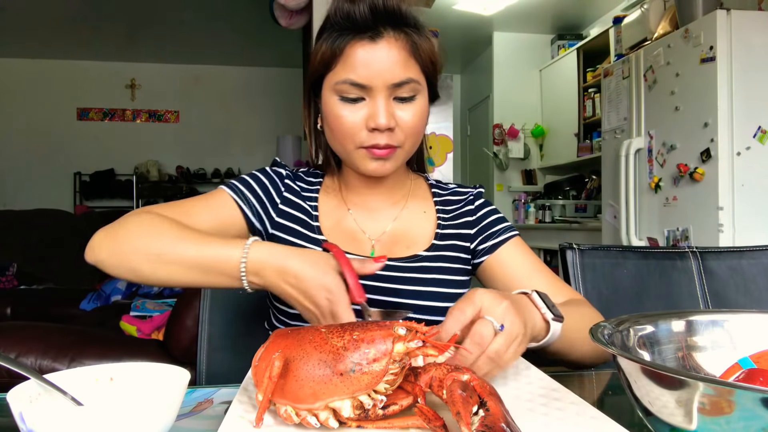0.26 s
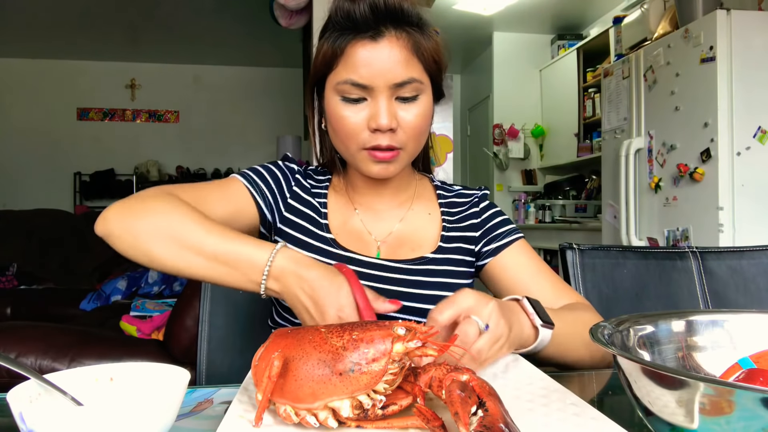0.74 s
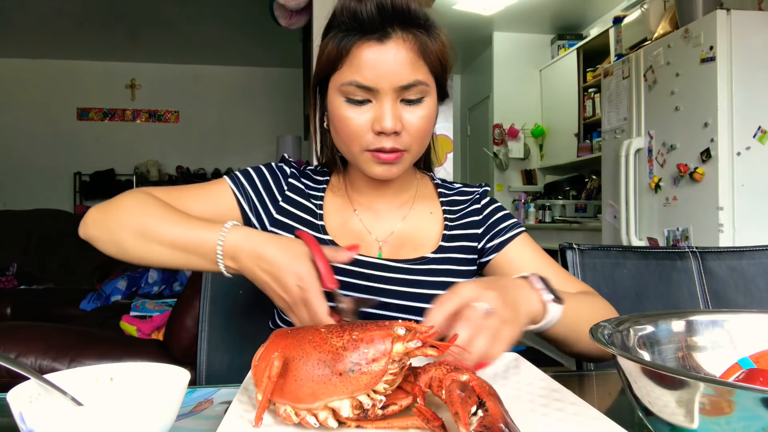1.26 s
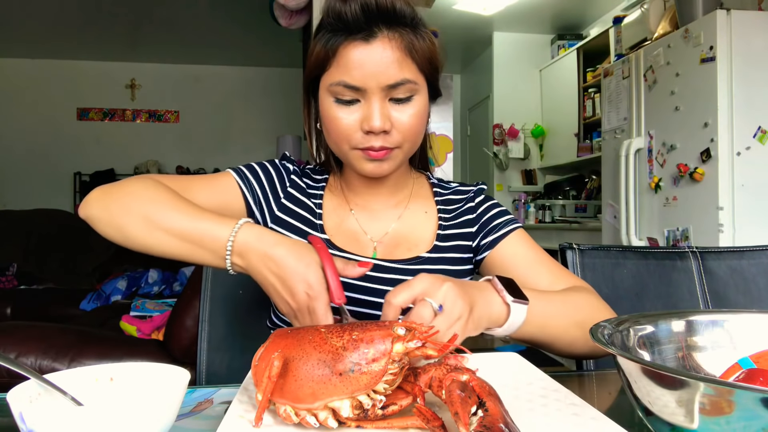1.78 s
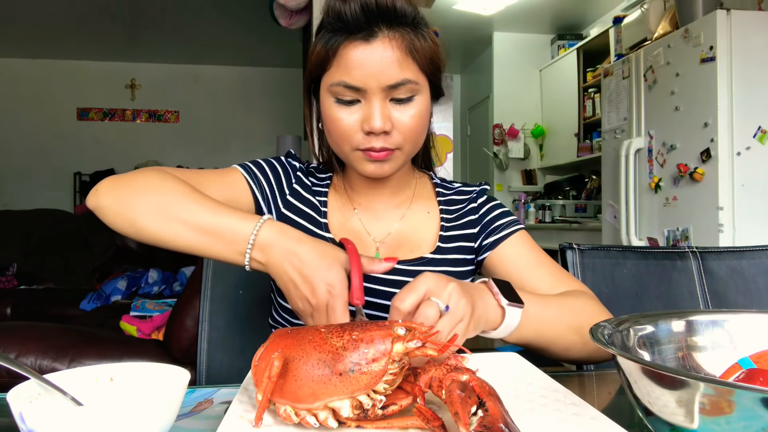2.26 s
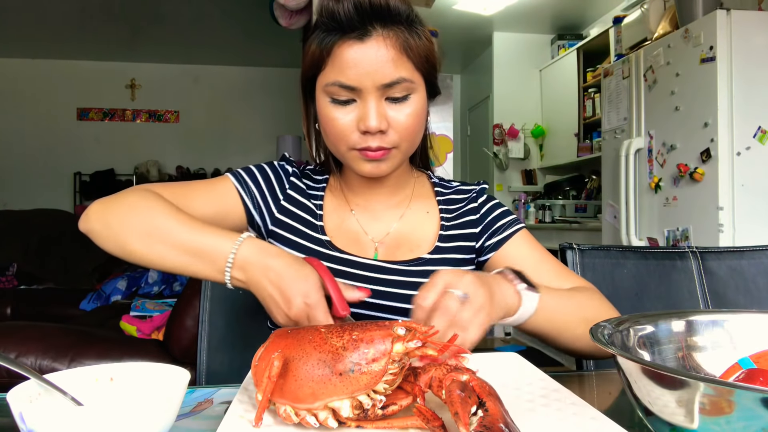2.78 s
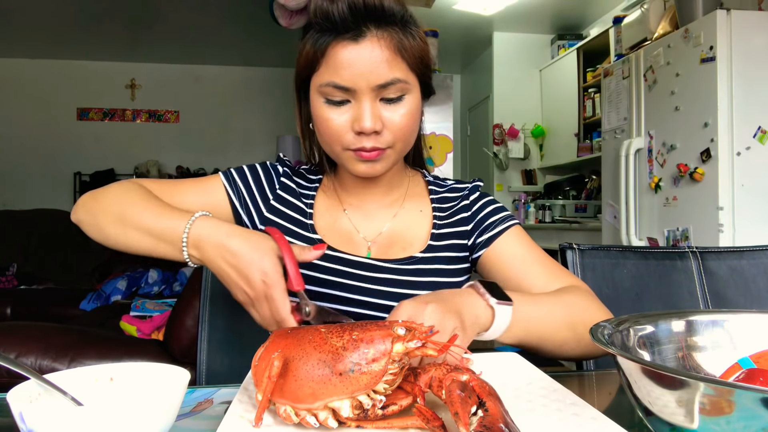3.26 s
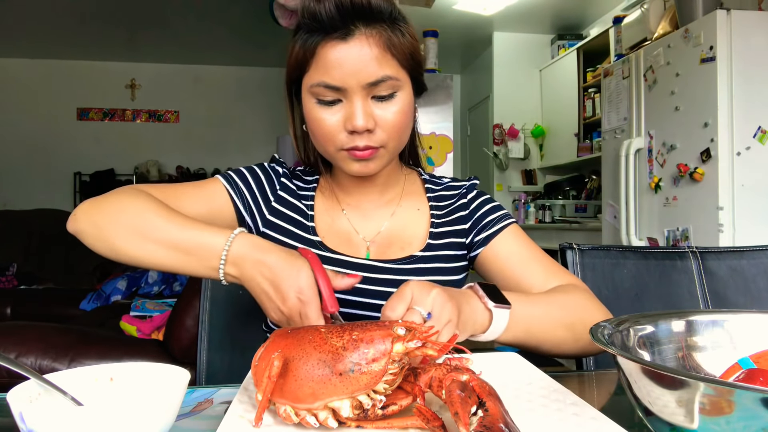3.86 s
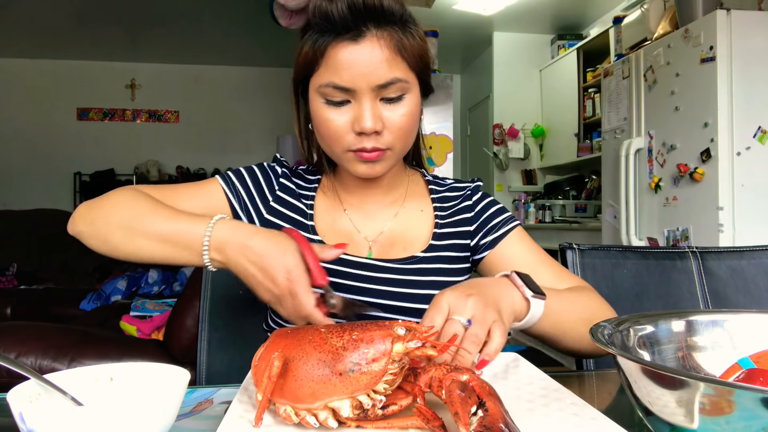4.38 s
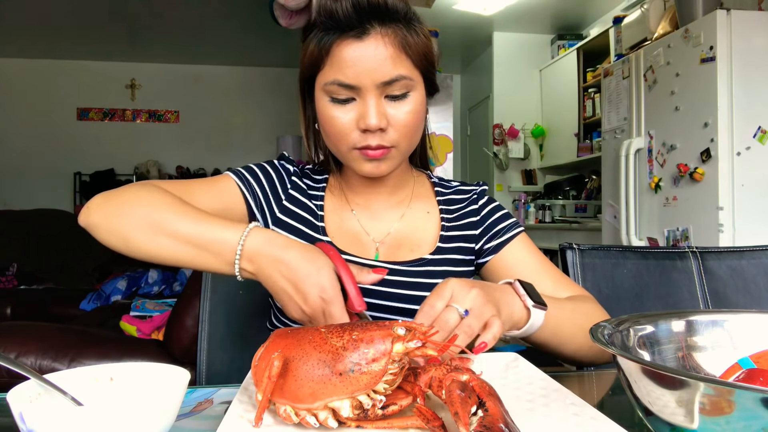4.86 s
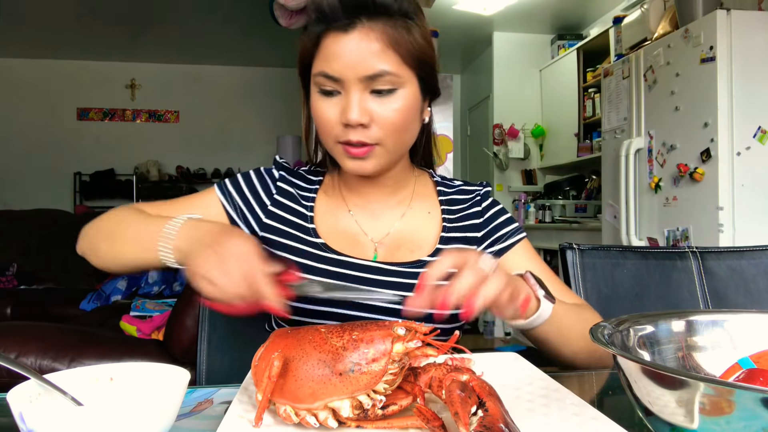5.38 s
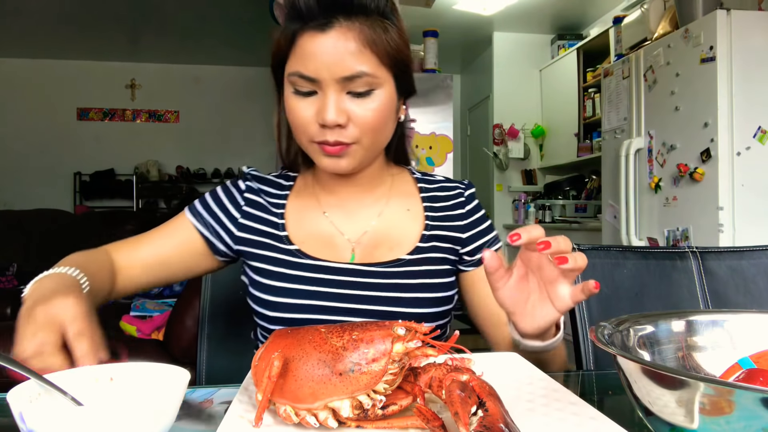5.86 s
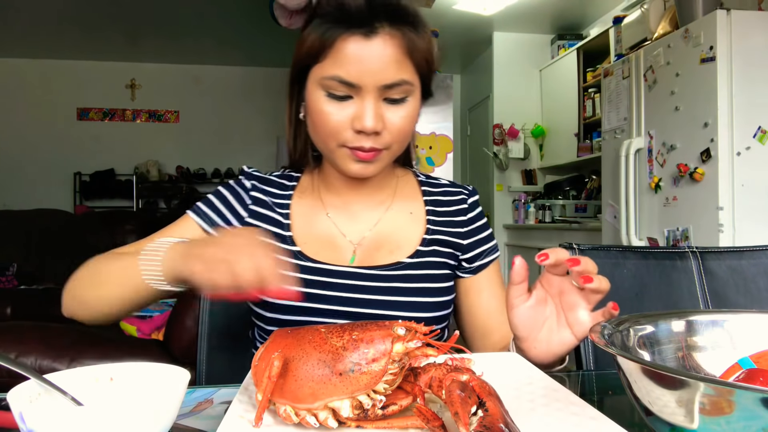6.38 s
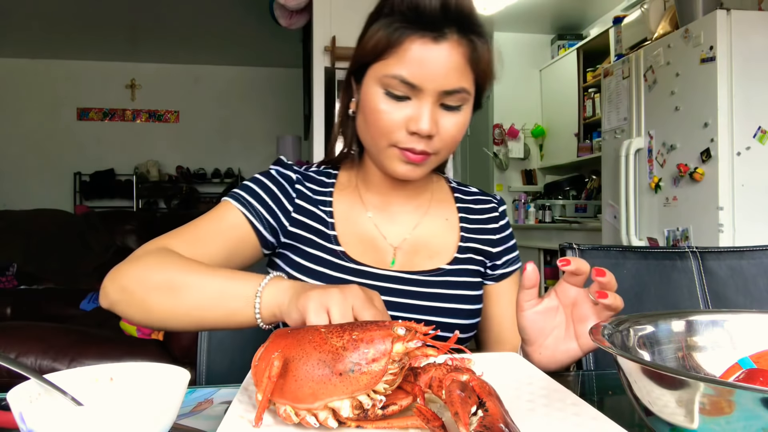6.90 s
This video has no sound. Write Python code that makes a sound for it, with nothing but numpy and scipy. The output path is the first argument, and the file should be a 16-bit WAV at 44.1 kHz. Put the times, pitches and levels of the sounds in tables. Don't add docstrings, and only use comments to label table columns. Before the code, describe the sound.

Sharp, cracking scissor cuts through cooked shell, faint steel scrapes and dull knocks, then scissors dropped on a tabletop over a low refrigerator drone.

```python
import sys
import numpy as np
from scipy import signal
from scipy.fft import rfft, irfft, next_fast_len
from scipy.io import wavfile

SR = 44100
rng = np.random.default_rng(int(sys.argv[2]) if len(sys.argv) > 2 else 0)


def transcribe(signal):
    frames = np.atleast_2d(signal).T
    limited = np.clip(frames, -1, 1)
    pcm = np.round(limited * 32767).astype(np.int16)
    wavfile.write(sys.argv[1], SR, pcm)


def level_to_linear(level):
    exponent = np.asarray(level, float) / 20
    return 10 ** exponent


N = 314433


def unit(x):
    return x / np.sqrt(np.mean(x ** 2) + 1e-20)


def along(points, hz):
    f, v = np.transpose(points)
    return np.interp(np.log(hz + 1), np.log(f + 1), v)


def filtered(x, response):
    m = next_fast_len(N + SR // 2)
    spectrum = rfft(x, m) * response(np.fft.rfftfreq(m, 1 / SR))
    return irfft(spectrum, m)[..., :N]


def resonances(peaks):
    def response(f):
        total = 0
        for k, (centre, width, db) in enumerate(peaks):
            damping = 1j * f * width
            total = total + (-1) ** k * level_to_linear(db) * damping / (centre * centre - f * f + damping)
        return total
    return response


def struck(events, modes, body, low_hz, high_hz, clatter_db, clatter_s, after_db, level_db, attack_s=0.00042):
    out, t = np.zeros((2, N + SR)), np.arange(SR // 3) / SR
    hz, mode_db, t60 = np.transpose(modes)[:, :, None]
    bins = np.fft.rfftfreq(len(t), 1 / SR)
    for s, db, low_db, high_db, ring_db, note_hz in events:
        def tilt_db(f):
            return low_db / (1 + (f / low_hz) ** 4) + high_db / (1 + (high_hz / (f + 1)) ** 4)

        favour_db = 8 * np.exp(-(np.log(hz / note_hz) / 0.091) ** 2)
        luck_db, detune = rng.standard_normal((2, len(modes), 1))
        pitch = hz * (1 + 0.003 * detune)
        knots = rng.standard_normal((len(modes), 40))
        waver = np.array([np.interp(t * 90, np.arange(40), row) for row in knots])
        flutter_db = 4.5 * np.minimum(t / 0.02, 1) * waver
        strength_db = mode_db + tilt_db(hz) + ring_db + favour_db + 1.03 * luck_db
        rings = level_to_linear(strength_db + flutter_db - 60 * t / t60) * np.sin(2 * np.pi * pitch * t)
        noise = unit(irfft(rfft(rng.standard_normal(len(t))) * level_to_linear(along(body, bins))))
        noise = irfft(rfft(noise) * level_to_linear(tilt_db(bins)))
        fall = level_to_linear(-60 * t / clatter_s) + level_to_linear(after_db - 12 * t / clatter_s)
        both = np.array([rings.sum(axis=0), level_to_linear(clatter_db) * fall * noise])
        out[:, round(s * SR):][:, :len(t)] += level_to_linear(db + level_db) * both * (1 - np.exp(-t / attack_s))
    return out[:, :N]


# start in seconds, peak in dB, hollow shell in dB,
# blade tips in dB, favoured note in Hz.
SNIPS = [
    (0.8908, -6.5, -10.5, -5, 6010),
    (2.676, -5, -4, -5.5, 7380),
    (4.0043, -2.5, -1, -4.5, 5520),
    (4.9979, -8, -10.5, 1, 7860),
]
# pitch in Hz, level in dB, time to fade by 60 dB in seconds.
BLADES = [(725, 5, 0.018), (1240, -24, 0.07), (2090, -18.5, 0.036), (2770, -16, 0.036), (3520, -7.5, 0.011),
          (4080, 0.5, 0.0044), (4700, 7.5, 0.0047), (5520, 9, 0.0047), (5900, -23, .006), (6800, 2, 0.011),
          (7380, 2, 0.012), (7800, -31, 0.006)]
# frequency in Hz, level in dB per Hz.
SHELL = [(180, -51.5), (300, -80), (689, 3.5), (1750, -62), (2700, -5.5), (3760, -19), (5520, -12),
         (6410, -41.5), (7320, -7), (8640, -16), (16000, -19.5)]


def snips():
    events = [(s, db, hollow_db, tips_db, -0.5, hz) for s, db, hollow_db, tips_db, hz in SNIPS]
    return struck(events, BLADES, SHELL, low_hz=1000, high_hz=6500, clatter_db=7.0, clatter_s=0.0044,
                  after_db=-12.5, level_db=-11.0, attack_s=0.00021)


# frequency in Hz, level in dB.
CRACK = [(300, -46), (700, -4), (1500, -13), (2700, -1.5), (4200, -7), (6500, 4), (8500, -2.5),
         (11000, -14.5), (16000, -17)]


def snaps():
    s, db = np.transpose(SNIPS)[:2]
    impulses = np.bincount(np.round(s * SR).astype(int), level_to_linear(db), N)
    return filtered(impulses, lambda hz: level_to_linear(along(CRACK, hz)))


def slip_noise():
    fine_db = 2.5 * rng.standard_normal(N // 40 + 1).repeat(40)[:N]
    coarse_db = 1.5 * rng.standard_normal(N // 150 + 1).repeat(150)[:N]
    slips = rng.standard_normal(N) * level_to_linear(fine_db + coarse_db)
    bright = level_to_linear(-1.5) * unit(filtered(slips, resonances(SCRAPE_HIGH)))
    dull = level_to_linear(-6) * unit(filtered(slips, resonances(SCRAPE_LOW)))
    return slips, bright, dull


# centre in Hz, width in Hz, level in dB.
SCRAPE_LOW = [(1280, 420, 8), (2740, 820, 6.5), (3700, 1300, -1.5)]
SCRAPE_HIGH = [(5570, 2700, -1.5), (8170, 730, 2.5), (9500, 8500, -7.5)]


def gate(t, start, end):
    return np.clip(np.minimum(t - start, end - t) / 0.0011, 0, 1)


# end in seconds, length in seconds, first level in dB,
# last level in dB, dull layer in dB.
CUTS = [
    (0.889, 0.067, -62, -46.5, 7.5),
    (2.678, 0.14, -54, -50, 5),
    (3.998, 0.057, -52.5, -48, 1.5),
    (4.997, 0.036, -58, -60.5, 0),
]


def cuts(bright, dull):
    out, t = np.zeros(N), np.arange(N) / SR
    for end, length, first_db, last_db, dull_db in CUTS:
        left = np.clip(end - t, 0, length)
        bite_db = last_db + (first_db - last_db) * left / length
        surge_db = 17 * np.exp(-left / 0.0058)
        mix = level_to_linear(surge_db) * bright + level_to_linear(dull_db + 0.83 * surge_db) * dull
        out += gate(t, end - length, end) * level_to_linear(bite_db) * mix
    return out


# peak time in seconds, rise in seconds, fall in seconds,
# peak in dB, dull layer in dB.
SLIDES = [(0.02, 0.27, 0.51, -73.5, 16.5), (.79, 0.17, 0.11, -59, 10), (1.058, 0.023, 0.083, -52, -4),
          (2.85, 0.017, 0.18, -51.5, 2), (2.932, .004, 0.1, -78, 23.5), (4.18, 0.0556, 0.068, -49.5, 0.5),
          (4.986, 0.0081, 0.073, -57, -2), (5.192, 0.046, 0.07, -49, -0.5), (5.408, 0.017, 0.04, -54, 1),
          (5.52, 0.42, 0.25, -76.5, 18.5), (5.656, 0.045, 0.03, -53.5, -13), (5.974, .004, 0.1, -70, 17)]


def slides(bright, dull):
    out, t = np.zeros(N), np.arange(N) / SR
    for s, rise, fall, db, dull_db in SLIDES:
        on = slice(max(round(s * SR) - SR // 2, 0), round(s * SR) + SR)
        away = np.maximum((s - t[on]) / rise, (t[on] - s) / fall)
        out[on] += level_to_linear(db - 32 * away) * (bright[on] + level_to_linear(dull_db) * dull[on])
    return out


# start in seconds, length in seconds, level in dB,
# main note in Hz, fainter note in Hz.
RUBS = [(0.0, .16, -74, 3620, 3700), (.15, 0.098, -79, 3920, 4020), (0.876, .013, -47, 6800, 2760),
        (1.039, 0.035, -63, 6200, 5400), (2.664, .011, -43, 7400, 3600), (3.617, 0.22, -65, 1382, 895),
        (3.991, .011, -43, 5600, 2750), (4.761, .14, -69, 3170, 2760), (5.384, 0.034, -60, 6000, 5800),
        (5.4, .016, -58, 3000, 2600), (5.644, 0.027, -59, 5330, 2650), (5.73, 0.028, -66, 5840, 2700),
        (5.965, 0.15, -56, 435, 300), (5.967, .153, -62, 1460, 850)]


def rubs(slips, dull):
    out, t = np.zeros(N), np.arange(N) / SR
    for s, length, db, *notes_hz in RUBS:
        on = slice(round(s * SR), round((s + length) * SR))
        kicks = np.sign(slips[on])
        main, faint = (unit(signal.lfilter(*signal.iirpeak(hz, 32, SR), kicks)) for hz in notes_hz)
        squeak = main + level_to_linear(-4.5) * faint
        sag_db = 1 * (t[on] - s) / length
        out[on] += gate(t[on], s, s + length) * level_to_linear(db - sag_db) * (squeak + level_to_linear(-24.0) * dull[on])
    return out


def scrape():
    slips, bright, dull = slip_noise()
    return cuts(bright, dull) + slides(bright, dull) + rubs(slips, dull)


# start in seconds, length in seconds, first level in dB,
# last level in dB, treble in dB.
GRINDS = [
    (0.73, .04, -63, -56, 4),
    (0.768, .037, -54, -57, 4),
    (0.803, .085, -50, -54, 5),
    (0.892, .04, -44, -54, 4),
    (2.352, .13, -59, -68, 4),
    (2.499, .045, -60, -61, 7),
]
# centre in Hz, width in Hz, level in dB.
STEEL = [(1000, 58, 4.5), (1440, 50, -4), (2103, 30, 4.5), (2830, 65, -10.5), (3450, 99, -11.5),
         (4000, 40, -15.5), (4570, 100, -18), (5670, 50, -15)]


def grinds():
    low, high, t = np.zeros(N), np.zeros(N), np.arange(N) / SR
    for s, length, first_db, last_db, treble_db in GRINDS:
        on = slice(round(s * SR), round((s + length) * SR))
        push_db = first_db + 23.5 + (last_db - first_db) * (t[on] - s) / length
        push = level_to_linear(push_db) * rng.standard_normal(SR // 4)[:len(t[on])]
        low[on] += push
        high[on] += level_to_linear(treble_db) * push
    return filtered(low, resonances(STEEL[:3])) + filtered(high, resonances(STEEL[3:]))


# start in seconds, peak in dB, pitch in Hz.
CRACKS = [(0.7053, -48, 5640), (0.7335, -46, 2700), (0.7682, -51.5, 2700), (0.82, -37, 5030),
          (2.4997, -48, 4700), (2.5425, -37, 1450), (2.567, -40, 5800), (2.609, -36, 7150),
          (2.615, -34.5, 4700), (2.616, -41, 8300), (2.627, -43.5, 7440), (2.6399, -35, 6750),
          (2.644, -42.5, 6300)]
# start in seconds, peak in dB, pitch in Hz.
TICKS = [(0.125, -46, 3760), (0.2365, -49, 4030), (0.8908, -27.5, 2740), (1.0515, -51, 6500),
         (2.866, -36.5, 7000), (2.843, -44.5, 5050), (2.931, -32, 3500), (4.1565, -39.5, 5540),
         (4.1728, -33, 6800), (4.1756, -35, 2900), (4.211, -44, 2330), (4.2473, -47, 2670),
         (4.4967, -52, 3700), (4.5574, -50, 6100), (4.577, -45, 2810), (4.76, -45, 2960),
         (4.759, -40, 1500), (4.811, -54, 3200), (4.8255, -48, 3100), (4.829, -47, 2100),
         (4.986, -31, 3000), (4.9865, -28, 6000), (4.9977, -19, 3440), (5.1633, -45, 6400),
         (5.193, -40, 5850), (5.4073, -36, 6250), (5.41, -42, 3000), (5.407, -43, 2400),
         (5.4714, -45, 2570), (5.644, -44, 5600), (5.6597, -40, 5260), (5.662, -50, 2830), (5.7, -54, 2800),
         (5.75, -61, 5900), (5.972, -49.5, 2900), (6.106, -45.5, 6800), (6.773, -47, 2150)]


def ticks():
    out, t = np.zeros(N + SR), np.arange(SR // 20) / SR
    for s, db, hz in sorted(CRACKS + TICKS):
        ring = level_to_linear(-60 * t / 0.0089) * np.sin(2 * np.pi * hz * t)
        band = signal.iirpeak(hz, 0.7, SR)
        noise = rng.standard_normal(len(t))
        near_pitch = signal.lfilter(*band, signal.lfilter(*band, noise))
        puff = level_to_linear(-8.0 - 60 * t / 0.038) * (near_pitch + level_to_linear(-16.5) * noise)
        out[round(s * SR):][:len(t)] += level_to_linear(db) * (ring + puff)
    return out[:N]


# start in seconds, peak in dB, lowest frequency in Hz,
# highest frequency in Hz.
CLICKS = [(0.806, -25, 2000, 7000), (0.8132, -26, 2000, 7000), (0.8774, -33, 2200, 9000),
          (2.544, -40, 900, 6000), (2.5553, -43, 1500, 8000), (2.562, -36, 1540, 9000),
          (2.598, -28, 900, 6000), (2.609, -33, 3520, 10000), (2.664, -31, 1200, 9000),
          (2.8424, -34, 2500, 14000), (2.865, -45, 2000, 15000), (2.8866, -24, 1200, 15000),
          (2.9295, -45, 1200, 8000), (2.9525, -43, 2000, 7000), (3.9525, -40, 1000, 8000),
          (3.9592, -36, 1000, 6100), (4.988, -37, 2020, 12000), (5.4265, -36, 3000, 12000),
          (5.4716, -32, 790, 7000), (5.9706, -38, 1500, 9100), (6.1246, -13, 900, 7000),
          (6.128, -24, 700, 4000), (4.0042, -19, 10500, 16500), (4.9976, -20, 8000, 16500),
          (0.89, -23, 2200, 3200), (0.8915, -24, 1100, 1700), (2.678, -24, 2400, 3000),
          (2.585, -42, 3000, 9000), (2.632, -41, 4000, 9000), (2.652, -40, 3000, 9000)]


def clicks():
    out, t = np.zeros(N + SR), np.arange(SR // 40) / SR
    for s, db, low_hz, high_hz in CLICKS:
        band = signal.butter(2, [low_hz, high_hz], "band", fs=SR, output="sos")
        noise = unit(signal.sosfilt(band, rng.standard_normal(len(t))))
        out[round(s * SR):][:len(t)] += level_to_linear(db - 8 - 60 * t / 0.0043) * noise
    return out[:N]


# frequency in Hz, level in dB per Hz.
PLASTIC = [(350, -53), (700, -10.5), (1590, 4), (1890, -24.5), (2770, -11.5), (3120, -17), (3460, -19.5),
           (4750, -24), (5210, -27), (14000, -39.5)]
# start in seconds, peak in dB, table in dB, ringing in dB, favoured note in Hz.
KNOCKS = [
    (2.9289, -40.5, -4, -6, 1610),
    (3.242, -41, -17, 4, 2970),
    (3.8735, -34, 14, -6, 1500),
]
# pitch in Hz, level in dB, time to fade by 60 dB in seconds.
HANDLES = [(234, -10, 0.11), (282, -14, 0.24), (476, -14, 0.079), (942, -5, 0.18), (1133, -13.5, 0.19),
           (1020, -7.5, 0.16), (1340, -8, 0.2), (1430, -13.5, 0.2), (1603, -13, 0.072), (1620, -10, 0.12),
           (2040, 0.5, 0.037), (2230, -10, 0.092), (2734, -9.5, 0.09), (3510, -4, 0.033),
           (3970, -14, 0.029), (4730, -12, 0.036), (5540, -22.5, 0.053), (6200, -21, 0.0505),
           (8560, -31, 0.045)]


def light_knocks():
    events = []
    for s, db, table_db, ring_db, hz in KNOCKS:
        treble_db = 14.5 * abs(db / 40) ** 1.96
        events.append((s, db, table_db, treble_db, ring_db, hz))
    return struck(events, HANDLES, PLASTIC, low_hz=573, high_hz=2830, clatter_db=1.0, clatter_s=0.022,
                  after_db=-4.5, level_db=-11.5)


# pitch in Hz, level in dB, time to fade by 60 dB in seconds.
FIRST_KNOCK = [(0.554, -28, 1.5, 13.5, -0.5, 1324), (0.5605, -25.5, 0, -3, 4.5, 990)]
FIRST_GRIP = [(240, -12.5, 0.12), (818, -18, 0.22), (1020, -5, 0.078), (1324, -4.5, 0.091),
              (1482, -15, 0.32), (1555, -16, .04), (1654, -25, .14), (2100, -4.5, 0.056), (2700, -9, 0.097),
              (3144, -18, .1), (3590, -15, .05), (4600, -27, .04), (6100, -22.5, .04)]
SECOND_KNOCK = [(1.8767, -26, 0, 6, 0.24, 1600), (1.884, -28, 0, -16, 2.2, 1001)]
SECOND_GRIP = [(812, -19, 0.24), (1001, -10, 0.1), (1350, 1, .05), (1590, -24, 0.18), (1580, 0.5, 0.061),
               (2100, -2, 0.032), (2353, -12, .09), (2751, -8, 0.089), (3500, -5.5, .03), (4000, -15, .05),
               (4660, -5, 0.019), (6200, -16, .04)]
LAST_KNOCK = [(4.6626, -23, 3, 2.5, 0, 1600)]
LAST_GRIP = [(257, -2, 0.053), (598, -13, 0.13), (946, -8.5, 0.1), (1070, -23, .1), (1308, 0.5, 0.065),
             (1420, -9, 0.22), (1580, -7.5, 0.05), (2070, -10, 0.051), (2790, -4.5, 0.047),
             (3200, -10, 0.026), (4021, -11, 0.043), (4570, -13, .03), (6270, -13, .04)]


def firm_knocks():
    out = np.zeros((2, N))
    for events, grip in (FIRST_KNOCK, FIRST_GRIP), (SECOND_KNOCK, SECOND_GRIP), (LAST_KNOCK, LAST_GRIP):
        out += struck(events, grip, PLASTIC, low_hz=580, high_hz=3000, clatter_db=4.0, clatter_s=0.016,
                      after_db=-7, level_db=-12.5)
    return out


# start in seconds, peak in dB, table in dB, treble in dB, ringing in dB,
# favoured note in Hz.
PIVOT_KNOCKS = [(3.4015, -19, -2, 6.7, 1.7, 1547)]
# pitch in Hz, level in dB, time to fade by 60 dB in seconds.
PIVOT = [(247, -8.5, 0.18), (290.6, -4.5, 0.34), (950, -13, 0.23), (1310, -16, 0.073), (1410, -16, 0.27),
         (1554, -6.5, 0.15), (1597, -1.5, 0.096), (1620, -13, .025), (2150, 1.5, 0.037), (2220, -10, 0.062),
         (2710, -10, 0.12), (3530, -20, .05), (3800, -7.5, 0.03), (4660, -12.5, 0.031), (5540, -28, .08),
         (6340, -15, 0.026)]


def pivot_knock():
    return struck(PIVOT_KNOCKS, PIVOT, PLASTIC, low_hz=580, high_hz=3000, clatter_db=1.5, clatter_s=0.015,
                  after_db=-8.5, level_db=-12.5)


# start in seconds, peak in dB, table in dB, treble in dB, ringing in dB,
# favoured note in Hz.
WIDE_KNOCKS = [(2.3486, -14.5, 0, -1.5, 2, 1380)]
# pitch in Hz, level in dB, time to fade by 60 dB in seconds.
WIDE = [(253, -13.5, 0.23), (288.4, -15.5, 0.15), (818, -27, 0.16), (930, -13.5, .2), (1080, -15, 0.21),
        (1324, -5, 0.046), (1450, -16, 0.23), (1600, -8, .035), (2130, -18, .13), (2330, -5.5, 0.056),
        (2830, -10, 0.1), (465, -15.5, 0.1), (3460, -1.5, 0.039), (3440, -36.5, 0.15), (4780, -6, 0.036),
        (5539, -33, .25), (6400, -23, .03), (8200, -15, 0.025)]


def wide_knock():
    return struck(WIDE_KNOCKS, WIDE, PLASTIC, low_hz=590, high_hz=3100, clatter_db=4.0, clatter_s=0.018,
                  after_db=-3.5, level_db=-11.0)


# start in seconds, peak in dB, low end in dB, treble in dB,
# ringing in dB.
BLOWS = [
    (6.1239, -7.5, -8, 9, 3.5),
    (6.1276, -4.5, -8.5, -8, -7.5),
    (6.135, -12.5, -1, -11, 1),
    (6.2039, -14, 3.5, -10.5, -2.5),
    (6.208, -16.5, 6, -5.5, 3),
    (6.2167, -25.5, 2, -8, -3),
]
# pitch in Hz, level in dB, time to fade by 60 dB in seconds.
TABLE = [(148, -6.5, 0.49), (238, -24.5, 0.42), (283, -15.5, 0.52), (466, -14.5, 0.32), (623, -6.5, 0.3),
         (854, -19, 0.2), (930, -17, 0.27), (1026, -5, 0.16), (1170, 2, 0.047), (756, -21, 0.081),
         (1204, -4.5, 0.046), (1262, -2, 0.053), (1460, 1.5, 0.046), (1688, -4.5, 0.079), (1990, 1, 0.029),
         (2050, -20, 0.2), (2455, -14, 0.14), (2550, -16, 0.081), (2820, -25, 0.31), (3560, -12, 0.074),
         (4860, -19, .04)]
# frequency in Hz, level in dB per Hz.
WOOD = [(120, -38.5), (200, -13.5), (371, -5.5), (641, -8), (761, -4), (1270, -1.5), (1390, -17),
        (1700, 0.5), (2200, -15.5), (3560, -19.5), (7300, -28.5), (9200, -56), (22000, -120)]


def drop():
    events = [(*row, 1270) for row in BLOWS]
    return struck(events, TABLE, WOOD, low_hz=555, high_hz=2100, clatter_db=6.5, clatter_s=0.03,
                  after_db=-12, level_db=-15.5)


# start in seconds, peak in dB, treble in dB, ringing in dB,
# favoured note in Hz.
THUMPS = [
    (0.521, -24.5, -32, -9, 154),
    (0.808, -24.5, -2, 4.5, 265),
    (0.817, -22, -12, 6, 164),
    (0.833, -26, 6, -3, 148),
    (0.8905, -22.5, 13.5, 4.5, 247),
    (0.896, -23, 11.5, 3.5, 822),
    (0.905, -31, 14, -1, 283),
    (0.919, -37, 7, -9, 240),
]
# pitch in Hz, level in dB, time to fade by 60 dB in seconds.
BOARD = [(66.4, -2.5, 0.87), (141.6, 1.5, 0.29), (250.6, -2, 0.17), (283, -5.5, 0.23), (443, -8.5, 0.15),
         (628, -10.5, 0.14), (822, -16, 0.13), (1025, -6.5, 0.08), (1330, -2.5, 0.035),
         (2065, -11.5, 0.077)]
# frequency in Hz, level in dB per Hz.
CARCASS = [(53, -69.5), (90, 1.5), (388, -3), (1010, -17), (1870, -22), (2120, -36.5), (2370, -33),
           (2690, -21), (4000, -30.5), (5200, -41), (8800, -120)]


def thumps():
    events = [(s, db, -7, *rest) for s, db, *rest in THUMPS]
    return struck(events, BOARD, CARCASS, low_hz=199, high_hz=695, clatter_db=2.5, clatter_s=0.066,
                  after_db=-12.0, level_db=-12.0)


# frequency in Hz, left over right in dB.
LEAN = [(40, 16), (70, 11.5), (125, 7.5), (250, 3), (700, 2), (2400, 1.5), (5000, 1.5), (15000, 0)]
# frequency in Hz, lead in radians.
LEAD = [(40, 0.18), (80, 0.88), (125, 1.29), (200, 0.61), (400, 0.18), (1000, 0.019)]


def at_ports(near):
    def response(hz):
        lean_db = along(LEAN, hz) + 0.18 + 3.0 / (1 + ((hz - 4200) / 2500) ** 2)
        phase = hz / 16500 - along(LEAD, hz) / 2
        return level_to_linear(np.array([[0.5], [-0.5]]) * lean_db) * np.exp(np.array([[-1j], [1j]]) * phase)
    return filtered(near, response)


# frequency in Hz, time to fade by 60 dB in seconds.
WALLS = [(200, 0.24), (1000, 0.3), (3000, 0.35), (7000, 0.28), (12000, 0.323)]
# frequency in Hz, level in dB.
WET = [(100, 12), (700, -2.5), (1500, -8), (2500, -6.5), (5000, -6.5), (8000, -5), (12000, -8.5)]


def walls(x):
    out, step = np.zeros((2, N + SR)), SR // 3
    for start in range(0, N, step):
        hz, t, z = signal.stft(rng.standard_normal((2, SR // 2)), SR, nperseg=256)
        fade = level_to_linear(-60 * t / along(WALLS, hz)[:, None])
        tail = signal.istft(z * fade, SR, nperseg=256)[1]
        tail *= 1 - np.exp(-np.arange(tail.shape[1]) / SR / 0.00052)
        tail[1] = 0.28 * tail[0] + 0.72 * tail[1]
        wet = signal.fftconvolve(x[None, start:start + step], tail / np.linalg.norm(tail[0]), axes=1)
        out[:, start + 200:][:, :wet.shape[1]] += wet
    return filtered(out[:, :N], lambda hz: level_to_linear(along(WET, hz)))


# frequency in Hz, likeness from 0 to 1.
ALIKE = [(40, 0.87), (70, 0.99), (125, 1), (290, 0.78), (640, 0.84), (1400, 0.54), (3100, 0.075),
         (6800, .03)]


def diffuse(colour):
    def alike(hz):
        return np.clip(along(ALIKE, hz), 0, 0.99)

    def right(hz):
        return colour(hz) * level_to_linear(-along(LEAN, hz))

    a, b = rng.standard_normal((2, N))
    left = filtered(a, colour)
    shared = filtered(a, lambda hz: right(hz) * alike(hz) * np.exp(-1j * along(LEAD, hz)))
    own = filtered(b, lambda hz: right(hz) * np.sqrt(1 - alike(hz) ** 2))
    pair = np.array([left, shared + own])
    return pair / np.std(pair.mean(axis=0))


# time in seconds, level in dB.
COMPRESSOR = [(0.0, -35.5), (0.28, -41), (0.4, -48.5), (0.57, -32.5), (0.77, -47.5), (0.85, -31.5),
              (1.21, -38.5), (1.43, -48.5), (1.49, -40), (2.1, -45), (2.16, -39), (5.08, -41), (5.8, -34),
              (5.82, -40.5), (6.02, -32.5), (6.53, -44), (7.03, -38), (7.13, -41)]
# frequency in Hz, level in dB per Hz.
DRONE = [(20, -13.5), (27, -21), (36, -19.5), (41.5, -6.5), (43, 5), (45, -8), (52, -20), (65, -14.5),
         (85, -31), (110, -34)]
# centre in Hz, width in Hz, level in dB.
HUM = [(117.5, 3.05, 0.5), (354.4, 19.2, -15.5), (460, 11, -14.5)]


def refrigerator():
    s, db = np.transpose(COMPRESSOR)
    drone_db = np.interp(np.arange(N) / SR, s, db)
    drone = level_to_linear(drone_db + 4.5) * diffuse(lambda hz: level_to_linear(along(DRONE + [(200, -100.0)], hz)))
    return drone + level_to_linear(-55.5) * diffuse(resonances(HUM))


# frequency in Hz, level in dB per Hz.
AIR = [(41, -54.5), (70, -9.5), (124, 2.5), (172, -11.5), (203, -10), (368, -16.5), (665, -25), (724, -27),
       (843, -24), (998, -27.5), (1090, -31.5), (1200, -30), (4000, -44.5), (5200, -96.5), (8800, -120)]


def air():
    return level_to_linear(-48.5) * diffuse(lambda hz: level_to_linear(along(AIR, hz)))


# frequency in Hz, level in dB per Hz.
HISS = [(880, -5.5), (1500, -12), (1670, -13.5), (3840, -8.5), (4200, -7), (7340, -7), (15600, -8.5)]
HISS_TOP_HZ, TOP_HZ = 15800, 16900


def hiss():
    return level_to_linear(-64.5) * diffuse(lambda hz: level_to_linear(along(HISS, hz)) * (hz < HISS_TOP_HZ))


def scene():
    snip = snips()
    knocks = light_knocks() + firm_knocks() + pivot_knock() + wide_knock()
    blows = drop() + thumps()
    small = ticks() + clicks() + scrape() + grinds()
    crack = snaps()
    near = (snip + knocks + blows).sum(axis=0) + small + level_to_linear(-18.5) * crack
    around = level_to_linear(14.0) * crack + level_to_linear(-17.0) * snip.sum(axis=0) + small
    around += level_to_linear([-5, 1.5]) @ knocks + level_to_linear([-7, -0.5]) @ blows
    return at_ports(near) + walls(around) + refrigerator() + air() + hiss()


def low_pass(x):
    return signal.sosfilt(signal.butter(12, 16940, fs=SR, output="sos"), x)


def record(dry):
    held = dry / (1 + np.abs(dry / 0.9) ** 6) ** (1 / 6)
    mix = filtered(held, lambda hz: (hz < TOP_HZ) * level_to_linear(-20.0 * (hz > HISS_TOP_HZ)))
    return low_pass(mix)


dry = scene()
out = record(dry)
transcribe(out)
```